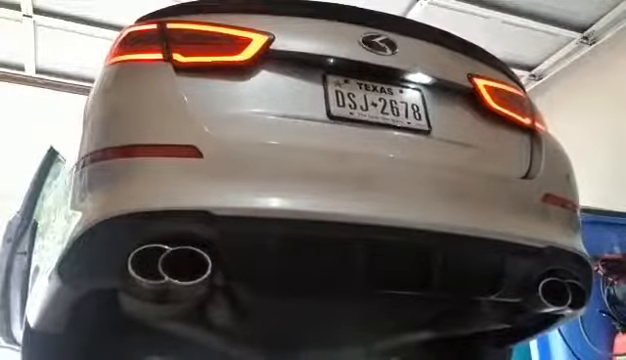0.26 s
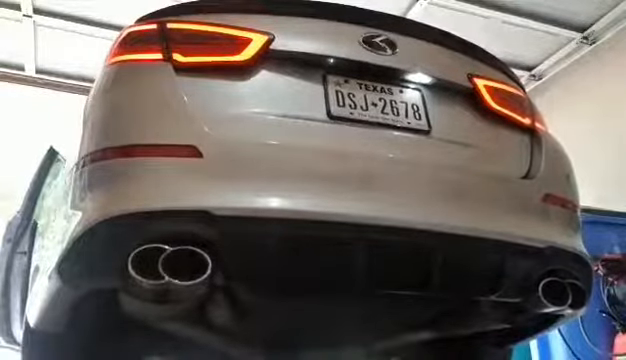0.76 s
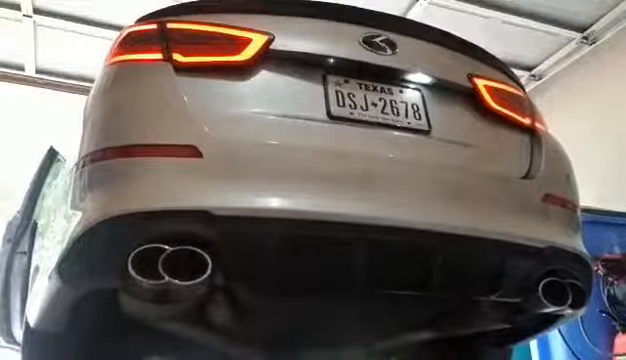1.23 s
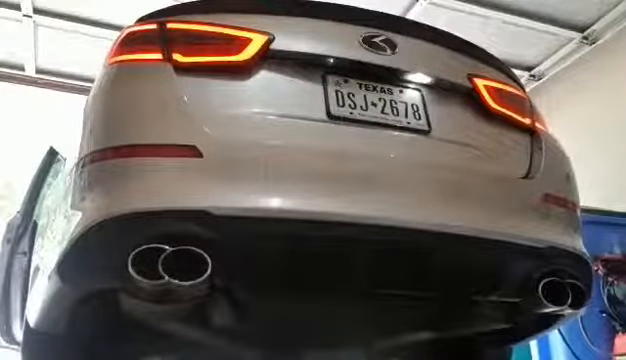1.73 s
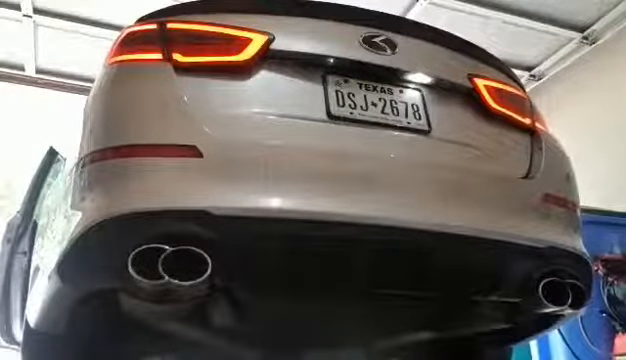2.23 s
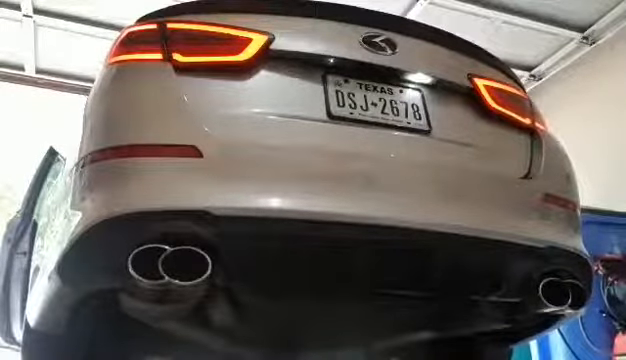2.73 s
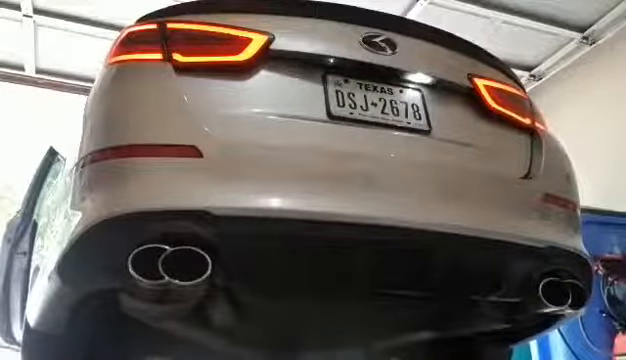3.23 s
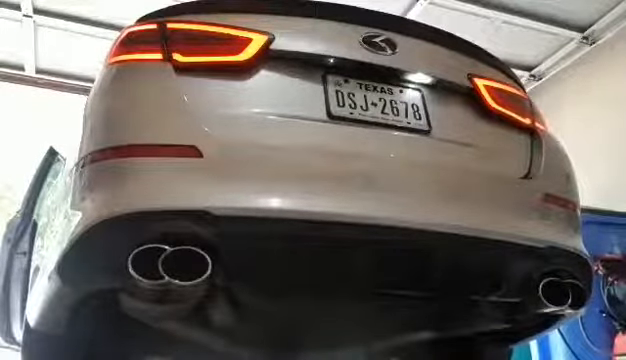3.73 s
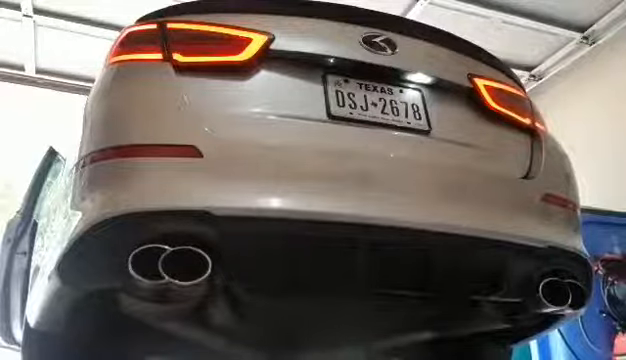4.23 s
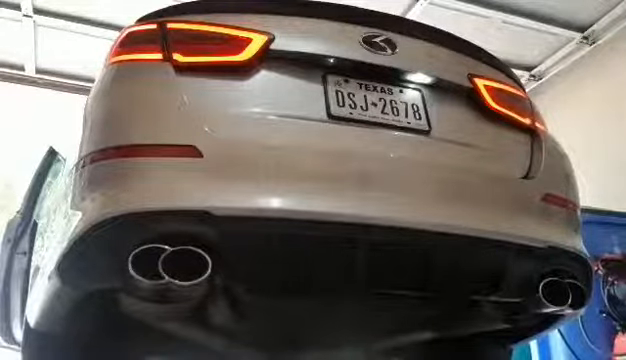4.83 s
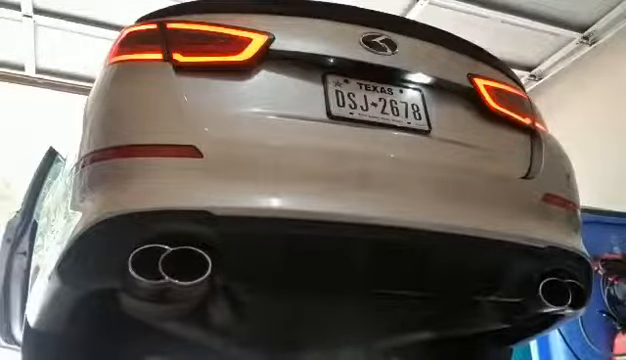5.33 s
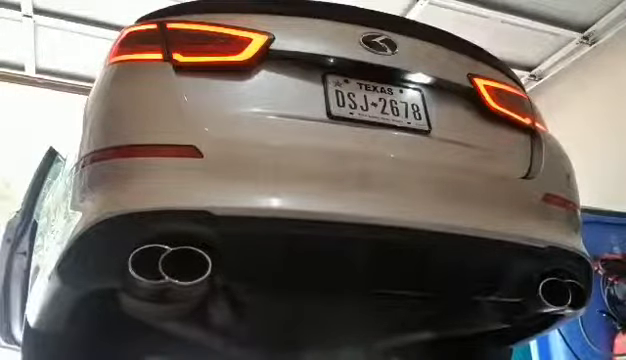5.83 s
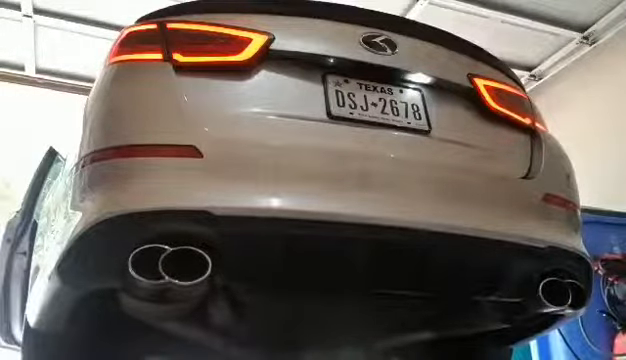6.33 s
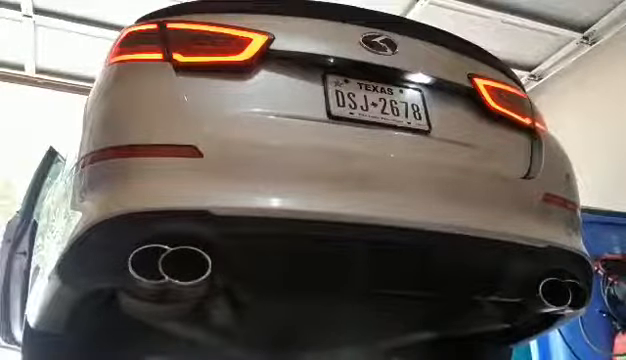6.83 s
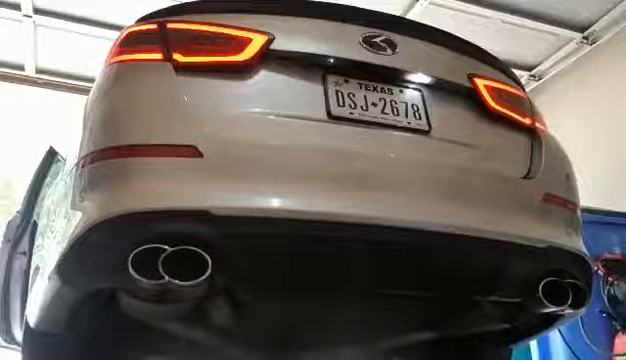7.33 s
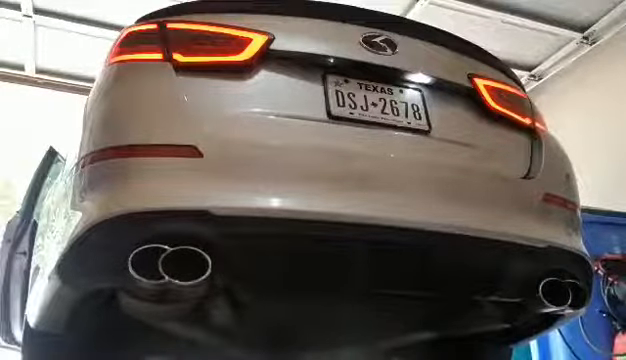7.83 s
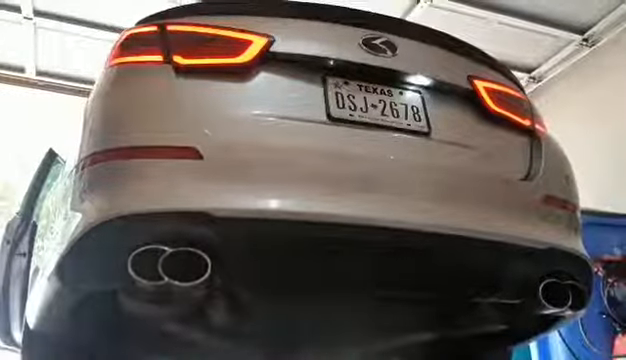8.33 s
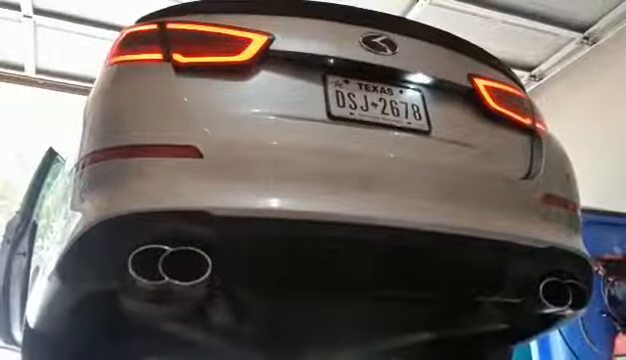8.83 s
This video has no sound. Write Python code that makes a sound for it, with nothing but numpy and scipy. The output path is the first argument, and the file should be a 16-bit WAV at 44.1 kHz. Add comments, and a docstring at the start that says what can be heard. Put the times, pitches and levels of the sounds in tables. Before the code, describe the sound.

A turbocharged four-cylinder car is heard from just behind its tailpipes in a garage with short, tight echoes. For the first 4.5 seconds it idles with a deep, even, hollow throb and faint valve ticking. A gentle rev rises until about 5.2 seconds and drops with a thumping pop. A second, higher rev runs from 6 to 6.7 seconds, barking at the top, followed by a quick string of pops. From 7.3 seconds the engine climbs much higher, rasping over rushing gas and a growing turbo hiss. At about 8.3 seconds the throttle shuts: the blow-off valve gives a high whistle and a sputtering rush of air, while the exhaust crackles and bangs rapidly until around 8.8 seconds. A short, light blip with two small pops comes near 9 seconds, with the engine still spinning fast.

```python
"""A turbocharged four-cylinder car, heard from just behind its tailpipes, idles in a garage and is then
blipped higher and higher. Each firing booms in the silencer and, under load, steepens into a rasp in
the pipes over a hiss of gas. When the throttle shuts, unburnt fuel pops in the exhaust, and after the
highest blip the turbo's blow-off valve whistles. Valve gear and intake sound faintly under the bonnet."""
import sys
import numpy as np
from scipy import signal
from scipy.fft import rfft, irfft, next_fast_len
from scipy.io import wavfile
from scipy.ndimage import uniform_filter1d

SR = 44100
rng = np.random.default_rng(int(sys.argv[2]) if len(sys.argv) > 2 else 0)


def inscribe(sig):
    """Save sig as 16-bit PCM at rate SR to the path in sys.argv[1].

    A 1-D sig is mono; a 2-D sig holds one channel per row.
    Samples are clipped to [-1, 1] before scaling.
    """
    pcm = np.round(np.clip(np.atleast_2d(sig).T, -1, 1) * 32767)
    wavfile.write(sys.argv[1], SR, pcm.astype(np.int16))


N = 399987
TIME = np.arange(N) / SR
IDLE_RATE = 29.0  # firings a second, the unit of every engine speed
VALVE_OPENS_S = 8.268  # the blow-off, just after the highest blip


def gain_of(db):
    """Decibels to amplitude."""
    return 10 ** (np.asarray(db) / 20)


def evened(x):
    """Scales to rms 1."""
    return x / np.sqrt(np.mean(x ** 2) + 1e-20)


def levelled(x, size=3050):
    """Holds the running rms of the mono mix at 1, smoothing over size samples."""
    power = np.atleast_2d(x).mean(0) ** 2
    return x / np.sqrt(abs(uniform_filter1d(uniform_filter1d(power, size), size)) + 1e-14)


def curve_at(points, hz):
    """Reads a curve on a log-frequency axis."""
    f, value = np.transpose(points)
    return np.interp(np.log(hz + 1), np.log(f), value)


def cut(x, hz, kind, order):
    """High-pass or low-pass."""
    return signal.sosfilt(signal.butter(order, hz, kind, fs=SR, output="sos"), x)


def ring(x, modes):
    """Parallel resonances."""
    return sum(gain_of(db) * signal.lfilter(*signal.iirpeak(hz, hz / width, SR), x)
               for hz, width, db in modes)


def waver(hz):
    """Random wavering of rms 1, up to a rate."""
    return evened(cut(rng.standard_normal(N), hz, "low", order=2))


def noise_band(hz, width_hz):
    """A band of noise that follows a pitch curve."""
    a, b = cut(rng.standard_normal((2, N)), width_hz, "low", order=2)
    return evened(((a + 1j * b) * np.exp(2j * np.pi * np.cumsum(hz) / SR)).real)


def lagged(x, lag_s):
    """Follows a control with inertia."""
    keep = np.exp(-1 / (lag_s * SR))
    return signal.lfilter([1 - keep], [1, -keep], x)


def plateau(start, end, rise_s, fall_s):
    """Rises from 0 to 1 after start and falls back after end."""
    return np.clip(np.minimum((TIME - start) / rise_s, 1 - (TIME - end) / fall_s), 0, 1)


def gust(start, db, attack_s, hold_s, decay_db_per_s):
    """Attack, hold and a steady decay."""
    age = TIME - start
    decayed_db = decay_db_per_s * np.maximum(age - attack_s - hold_s, 0)
    return np.clip(age / attack_s, 0, 1) * gain_of(db - decayed_db)


def throb(firings, depth):
    """A gain that jumps at every firing and sags until the next."""
    return evened(1 + depth * np.exp(-(firings % 1) / 0.5))


# Stereo width of the garage. Each row: frequency in Hz, left-right likeness from 0 to 1.
LIKENESS = [(60, 0.0383), (280, 0.74), (610, 0.91), (1330, 0.0051), (2900, 0), (13000, 0.0154)]
# Its stereo balance. Each row: frequency in Hz, left minus right in dB.
BALANCE = [(60, 18), (370, -2), (1200, -1.5), (2200, -0.5), (4000, -3), (7500, -.5), (13000, 1)]
def diffuse(spectrum):
    """Coloured stereo noise with floor and wall echoes, narrow in the low mids and wide in the treble."""
    size = next_fast_len(N)
    hz = np.fft.rfftfreq(size, 1 / SR)
    a, b = rfft(rng.standard_normal((2, size)))
    same = np.clip(curve_at(LIKENESS, hz), -1, 1)
    pair = np.array([a, same * a + np.sqrt(1 - same ** 2) * b])
    pair *= gain_of(np.outer([.5, -.5], curve_at(BALANCE, hz)))
    echoes = 1 + .12 * np.exp(-2j * np.pi * hz * .0016) + .2 * np.exp(-2j * np.pi * hz * .0071)
    return evened(irfft(pair * echoes * gain_of(curve_at(spectrum, hz)), size)[:, :N])


def garage(x, wet_db, t60, lean_db):
    """Direct sound, reaching the right microphone first, plus a short tail of scattered reflections."""
    t = np.arange(SR // 2) / SR
    taps = rng.standard_normal((2, len(t))) * (rng.random((2, len(t))) < .08)
    taps *= (t > .003) * gain_of(-60 * t / t60)
    taps *= gain_of(wet_db) / np.linalg.norm(taps[1])
    taps[[0, 1], [6, 0]] += 1  # the direct sound
    return signal.oaconvolve(x[None], taps, axes=1)[:, :N] * gain_of([[lean_db / 2], [-lean_db / 2]])


# Throttle blips. Each row: opening and shutting in seconds, firings a second at opening and at the top,
# bend of the fall before it, bend of the climb, load rise in seconds, load 0 to 1, load fall in seconds.
BLIPS = [(4.51, 5.224, 29.0, 58.1, 1.0, 1.16, .12, .8, .5),
         (5.982, 6.699, 44.5, 83.5, 1.96, 2.32, .34, .78, .24),
         (7.253, 8.262, 70.7, 188.5, 1.96, 1.34, .13, .9, .66),
         (8.91, 9.07, 134.5, 154.2, .95, .9, .08, .6, .4)]
def engine_speed():
    """The engine climbs while the throttle is open and coasts down until the next blip."""
    speed, last_shut, last_top = np.zeros(N), 0, IDLE_RATE
    for opens, shuts, low, top, fall_bend, climb_bend, *_ in BLIPS:
        fall = low + (last_top - low) * np.interp(TIME, [last_shut, opens], [1, 0]) ** fall_bend
        climb = (top - low) * np.interp(TIME, [opens, shuts], [0, 1]) ** climb_bend
        speed = np.where(TIME >= last_shut, fall + climb, speed)
        last_shut, last_top = shuts, top
    return speed


def engine_load(idle_load=0.62454, linger_s=0.15026):
    """How hard the cylinders fire; the load outlasts the throttle while the manifold empties."""
    blips = [load * plateau(opens, shuts + linger_s, rise_s, fall_s)
             for opens, shuts, *_, rise_s, load, fall_s in BLIPS]
    return np.max(blips + [idle_load * (TIME < BLIPS[0][1])], axis=0)


# Tone of the valve gear. Each row: frequency in Hz, relative noise density in dB.
CLATTER_TONE = [(100, -5), (220, -5), (400, -4), (800, -10.5), (1200, -8.5), (1500, -15), (1800, -13.5),
                (2600, -13.5), (3500, -19.5), (4800, -25), (6500, -23.5), (8500, -34.5), (12000, -31)]
def clatter(firings, level_db=-46):
    """Valve gear and injectors, far off under the bonnet, ticking with the firings."""
    return gain_of(level_db) * diffuse(CLATTER_TONE) * throb(firings + 0.9, depth=0.55)


# Tone of the open intake. Each row: frequency in Hz, relative noise density in dB.
INDUCTION_TONE = [(800, -19), (1500, -7), (2300, -0.5), (3200, -6), (4500, -12.5), (7000, -17), (9000, -30)]
def induction(firings, load, gain_db=-47.5):
    """Air drawn through the open throttle growls under the bonnet, swelling as the manifold fills."""
    draw = lagged(load * plateau(BLIPS[0][0], BLIPS[-1][1], .3, .1), lag_s=.16)
    return gain_of(gain_db) * draw ** 2.418 * diffuse(INDUCTION_TONE) * throb(firings, depth=.8)


# Hiss of the spinning turbo. Each row: frequency in Hz, relative noise density in dB.
TURBO_TONE = [(1000, -25), (2400, -2.5), (4600, -6.5), (6300, 0.5), (7300, -7), (8500, -16.5), (12000, -14)]
def turbo(speed, hiss_db=-49, whoosh_db=-40.5, whoosh_start_s=8, first_hz=2200.5, last_hz=4899.5):
    """The turbo lags the engine and hisses; near full boost a whoosh climbs until the valve opens."""
    spin = lagged(np.maximum(speed - IDLE_RATE, 0) / speed.max(), lag_s=.14)
    hz = first_hz + (last_hz - first_hz) * np.interp(TIME, [whoosh_start_s, VALVE_OPENS_S], [0, 1]) ** 3
    whoosh = np.array([noise_band(hz, width_hz=650) for _ in range(2)])
    swell = plateau(whoosh_start_s, VALVE_OPENS_S + 0.0594, 0.3249, 0.0928)
    return gain_of(hiss_db) * spin ** .7 * diffuse(TURBO_TONE) + gain_of(whoosh_db) * swell * whoosh


# Broad rush of gas. Each row: frequency in Hz, relative noise density in dB.
GAS_TONE = [(150, 9), (330, 11), (900, 6.5), (1300, 5.5), (1650, -1), (2400, -0.5), (3500, -6.5),
            (4800, -8.5), (6500, -5.5), (8500, -15), (10500, -12), (12800, -9.5)]
def gas(firings, speed, hiss_db):
    """Gas rushing out of the pipes, which only sets in above idle flow."""
    flow = np.sqrt(np.clip(1 - (IDLE_RATE / speed) ** 4, 0, 1))
    return gain_of(hiss_db) * flow * diffuse(GAS_TONE) * throb(firings, depth=0.23)


# Bright hiss of a fine jet. Each row: frequency in Hz, relative noise density in dB.
JET_TONE = [(2000, -30), (4200, -20), (5400, -9.5), (6700, -2.5), (7600, -12.5), (8600, -15), (10300, 2),
            (12800, 0)]
# Short spurts of air. Each row: start in seconds, level in dB, decay in dB a second.
SPURTS = [(5.33, -53.5, 600), (6.857, -47, 700), (7.632, -47.5, 701.5), (8.208, -36, 200),
          (8.54, -29.5, 400)]
def vented_air(speed, sputter, spool_db=-31.5):
    """Boost air escapes in spurts, a sputtering rush and a roar; the turbo's hiss joins at top speed."""
    spurts = sum(gust(start, db, 0.00796, 0, decay) for start, db, decay in SPURTS)
    rush = gust(VALVE_OPENS_S, db=-27, attack_s=0.0116, hold_s=0.0419, decay_db_per_s=58)
    roar = gust(VALVE_OPENS_S - .03, db=-22.5, attack_s=0.1392, hold_s=0.1316, decay_db_per_s=29.5)
    spool = gain_of(spool_db) * (speed / speed.max()) ** 4.4
    return (sputter * rush + spurts) * diffuse(JET_TONE) + np.hypot(roar, spool) * diffuse(GAS_TONE)


# Ring of the blow-off valve. Each row: pitch in Hz, width in Hz, gain in dB.
VALVE_MODES = [(5434.6, 272.7, -8), (6127.5, 204, -2), (6542.7, 340, 0.5)]
def blow_off(speed, whistle_hz=6694.8, whistle_sag_hz=69.73, skirt_hz=6787.2, skirt_sag_hz=499.86):
    """The valve whistles, a noisy skirt sinks with the boost, and the air behind rings up a shriek."""
    spent = 1 - np.exp(-(np.maximum(TIME - VALVE_OPENS_S, 0) / .24) ** 2)
    whistle = gust(VALVE_OPENS_S, db=-25, attack_s=0.024, hold_s=0.0381, decay_db_per_s=85)
    whistle *= levelled(noise_band(whistle_hz - whistle_sag_hz * spent, width_hz=32), size=900)
    skirt = gust(VALVE_OPENS_S, db=-29, attack_s=0.0763, hold_s=0.1387, decay_db_per_s=72.5)
    skirt *= noise_band(skirt_hz - skirt_sag_hz * spent, width_hz=250)
    shriek = gust(VALVE_OPENS_S, db=-36.5, attack_s=0.2335, hold_s=0.0521, decay_db_per_s=61.5)
    shriek *= evened(cut(ring(rng.standard_normal(N), VALVE_MODES), 6958, "low", order=6))
    sputter = gain_of(2 * waver(hz=13.5) + 2 * waver(hz=130))
    valve = garage(whistle + skirt + sputter * shriek, wet_db=1, t60=.2, lean_db=-3.5)
    return valve + vented_air(speed, sputter)


# Midrange ring of the tailpipes. Each row: pitch in Hz, width in Hz, gain in dB.
PIPE_MODES = [(346.06, 130, -15), (462.47, 45, -5), (530.05, 51.855, -1.5), (619.3, 60, -5),
              (697.06, 60, -5), (799.41, 55, -2), (929.83, 90, -8), (1083.9, 110, -9.5),
              (1275.8, 140, -13.5)]
def tailpipe(x, far_delay_s=.0017, far_share=.5):
    """The pipes ring, neighbouring modes in opposite sign; the far pair arrives later and weaker."""
    rung = ring(x, PIPE_MODES[::2]) - ring(x, PIPE_MODES[1::2])
    near = cut(cut(rung, 300, "high", order=3), 1400, "low", order=6)
    far = np.r_[np.zeros(round(far_delay_s * SR)), near][:len(near)]
    return near + far_share * far


def spit(x):
    """The bright edge of a shock, which leaves the pipes without ringing them."""
    return cut(cut(x, 1400, "high", order=1), 2700, "low", order=3)


def crackle(per_s=190, spread_db=3.5, burst_s=0.000921, spit_db=-12):
    """Unburnt fuel goes off in many small bursts around the top of the highest blip and after it."""
    sparks = (rng.random(N) < per_s / SR) * gain_of(spread_db * np.minimum(rng.exponential(1, N), 2))
    bursts = lagged(sparks, burst_s) * rng.standard_normal(N)
    sound = evened(tailpipe(bursts) + gain_of(spit_db) * spit(bursts))
    envelope = gust(8, db=-32.5, attack_s=0.0054, hold_s=0.2717, decay_db_per_s=42.5)
    return garage(envelope * sound, wet_db=-4, t60=.2, lean_db=-2)


# Exhaust pops. Each row: start in seconds, crack level in dB, burst decay in seconds,
# gain of the bright spit within the crack in dB, thump level in dB.
POPS = [(5.332, -25.5, 0.01514, -22, -10.5), (6.747, -19, 0.001543, -14.5, -23),
        (6.782, -14, 0.001523, -18, -12), (6.822, -22, 0.003945, -20.5, -18),
        (6.859, -14.5, 0.001645, -18.5, -18), (6.887, -21.5, 0.00186, -18.5, -21),
        (8.271, -15, 0.002108, -17, -29), (8.296, -15, 0.00292, -14.5, -26.5),
        (8.319, -15, 0.002774, -11, -20.5), (8.363, -11, 0.00414, -12.5, -16),
        (8.393, -12.5, 0.00352, -13.5, -6), (8.409, -10, 0.00192, -16, -10.5),
        (8.432, -5.5, 0.00191, -15.5, -8), (8.442, -7, 0.001982, -15.5, -8),
        (8.452, -14.5, 0.001665, -11.5, -14), (8.482, -8.5, 0.002878, -18, -14),
        (8.499, -23.5, .002, -15.5, -9), (8.542, -10, 0.0035, -14, -14),
        (8.552, -10.5, 0.00299, -17.5, -24), (8.655, -16.5, 0.00448, -9, -27.5),
        (8.695, -7.5, 0.001605, -12.5, -12), (8.731, -19, 0.00206, -8, -24),
        (8.745, -24.5, 0.001688, -16.5, -16), (8.912, -22.5, 0.001973, -28, -14),
        (8.952, -28, 0.002186, -25.5, -17.5)]
def afterfire(thump_s=.0015, tail_s=0.03322):
    """Each pop of unburnt fuel is a sharp burst in the pipes and a slower push through the silencer."""
    t = np.arange(SR // 4) / SR
    push = cut(cut(t * np.exp(-t / thump_s), 66.84, "high", order=4), 110.9, "low", order=4)
    cracks, thumps = np.zeros((2, N + len(t)))
    for start, crack_db, crack_s, spit_db, thump_db in POPS:
        burst = rng.standard_normal(len(t)) * (np.exp(-t / crack_s) + 0.1362 * np.exp(-t / tail_s))
        crack = tailpipe(burst + 14 * (t == 0)) + gain_of(spit_db) * spit(burst)
        at = round(start * SR)
        cracks[at:at + len(t)] += gain_of(crack_db) * crack / abs(crack).max()
        thumps[at:at + len(t)] += gain_of(thump_db) * push / abs(push).max()
    return garage(cracks[:N], wet_db=-6, t60=.22, lean_db=-2) + thumps[:N]


def sizzle(firings, rasp_db, offset_db=-24.5):
    """Hard pulses tear into fine eddies at the pipe lips."""
    hardness = np.clip((rasp_db + 49.5) / 12, 0, 1)
    return gain_of(rasp_db + offset_db) * hardness * diffuse(JET_TONE) * throb(firings, depth=1.5)


# The lope of the engine. Each entry: one cylinder's accent in dB, in firing order.
CYLINDERS_DB = [-.1, -.5, 1.1, -.5]
def cylinder(firings):
    """Strength of the cylinder that is firing; one fires harder than the rest."""
    return gain_of(CYLINDERS_DB)[firings.astype(int) % len(CYLINDERS_DB)]


# Narrow pipe tones that sing while little gas flows. Each row: pitch in Hz, width in Hz, gain in dB.
HOLLOW_MODES = [(231.85, 8, 2), (290.72, 7.5, -14.5), (348.02, 7.4, -3), (494.93, 22, -3.5),
                (520.41, 16, 1.5), (562.88, 34, -11.5), (868.36, 20, -12), (928, 46, -13.5),
                (1066.3, 51, -13.5)]
def hollow(firings, speed, idle_db=-46, damping_db=1.5, soft_hz=1150):
    """At idle the soft-edged pulses ring the pipes in steady tones, which faster flow damps."""
    fronts = cut(np.diff(firings.astype(int), prepend=0) * cylinder(firings), soft_hz, "low", order=4)
    tones = levelled(cut(ring(fronts, HOLLOW_MODES), 220, "high", order=4))
    return gain_of(idle_db - damping_db * (speed - speed.min())) * tones


# Barks of the exhaust. Each row: start, length, rise and fall in seconds, then strength in dB.
BARKS = [(4.853, 0.3798, .14, .3, 2.5), (6.563, 0.188, 0.06072, 0.08804, 15),
         (6.823, 0.10386, 0.06605, 0.1284, 8), (7.347, 0.0675, 0.04794, 0.10136, 5.5),
         (7.492, 0.17851, 0.1604, 0.08728, 13), (8.178, 0.2866, 0.0846, 0.1107, 5)]
def barks():
    """Pulses steepen into shocks in the pipes: a lift in dB, of which each exhaust layer takes a part."""
    return sum(db * plateau(start, start + length, rise, fall) for start, length, rise, fall, db in BARKS)


def rasp(firings, speed, load, jitter_s=.00007, scatter_db=.5, puff_cycles=.085, spit_db=-33):
    """The steep front of each pulse, and the turbulent puff behind it, ring the tailpipes."""
    # Each front arrives a little early or late, which blurs its upper harmonics.
    firings = np.maximum.accumulate(np.maximum(firings + speed * jitter_s * waver(hz=60), 0))
    count, phase = firings.astype(int), firings % 1
    # Turbulent share: slow firings puff, fast ones snap, and a coasting engine burns raggedly.
    rough = np.interp(speed, [56, 72], [.93, .08])
    rough += .06 * (1 - rough) * np.clip(1 - load, 0, 1)
    spread_db = scatter_db * (1 + np.log2(speed / IDLE_RATE))
    imbalance = 0.4813 * speed / speed.max() * np.clip(speed / IDLE_RATE - 1, 0, 1)
    strength = gain_of(spread_db * rng.standard_normal(N)[count]) * (1 + imbalance * (-1.) ** count)
    strength *= cylinder(firings) ** (IDLE_RATE / speed)
    fronts = levelled(np.diff(count, prepend=0) * 1.)
    puff_shape = 0.25 + phase / puff_cycles * np.exp(1 - phase / puff_cycles)
    puffs = evened(puff_shape * rng.standard_normal(N))
    drive = strength * (np.sqrt(1 - rough) * fronts + np.sqrt(rough) * puffs)
    pipes = tailpipe(drive) + gain_of(spit_db) * spit(drive * (1 - rough))
    left, right = garage(pipes, wet_db=-8, t60=.2, lean_db=-1)
    shaded = left - 0.7946 * cut(left, 900, "high", order=1)  # less upper rasp reaches the left
    return levelled(np.array([shaded, right]))


# Deep resonances of silencer and garage. Each row: pitch in Hz, width in Hz, gain in dB.
SILENCER_MODES = [(59.806, 8.802, 6), (88.573, 15.46, 4), (108.35, 12, -14), (148.16, 16.726, 0.3727),
                  (230.27, 14, -19.5)]
# Notches where the tailpipes cancel at the microphone. Each row: pitch in Hz, width in Hz.
NULLS = [(117, 6.9), (195, 41.9), (285, 78)]
def silencer(x):
    """Deep resonances and nulls; the small outlets radiate almost nothing below them."""
    x = -ring(x, SILENCER_MODES)
    for hz, width in NULLS:
        x = signal.lfilter(*signal.iirnotch(hz, hz / width, SR), x)
    return cut(cut(x, 51.839, "high", order=7), 310, "low", order=3)


def coasting(sound, speed, load, shelf_db=-8, shelf_hz=115):
    """A slowly coasting engine pumps air in limp, round pulses, so all but the deep bass drops."""
    deep = cut(cut(sound, shelf_hz, "low", order=5)[::-1], shelf_hz, "low", order=5)[::-1]  # zero phase
    limp = np.clip(1 - load / 0.3145, 0, 1) * np.interp(speed, [80, 120], [1, 0])
    return deep + gain_of(shelf_db * limp) * (sound - deep)


# Firings drop out just after the throttle shuts. Each row: centre in seconds, half length in seconds.
MISSES = [(5.303, 0.02513), (6.807, 0.01144), (8.341, 0.0234)]
def boom(firings, speed, load, bark_db, idle_db=-12.5, unloaded_db=-15, merge_rate=48.27):
    """One soft pressure pulse a firing booms in the silencer; at high speed the pulses run together."""
    count, phase = firings.astype(int), firings % 1
    revs = speed / speed.max()
    distinct = 1 / np.hypot(1, (speed / merge_rate) ** 1.8586)
    pulling = sum(plateau(opens, shuts - .1, 0.092, 0.077) for opens, shuts, *_ in BLIPS)
    # Alternate cylinders differ at idle, and more when pulling at high revs.
    imbalance = 0.093 * distinct ** 4 + 0.18975 * revs ** 3 * pulling
    strength = distinct * (1 + 0.08 * rng.standard_normal(N)[count]) + imbalance * (-1.) ** count
    missed = sum(np.exp(-((TIME - centre) / half_s) ** 2) for centre, half_s in MISSES)
    combustion = strength * (1 - missed) * gain_of(unloaded_db * (1 - load) + 0.2831 * bark_db)
    pumping = 0.17502 * revs ** 2 * (1 - pulling) * (1 + .4 * rng.standard_normal(N)[count])
    eddies = 0.01835 * np.clip(speed / IDLE_RATE - 1, 0, 1) * waver(hz=300)  # gas churns above idle
    pulse = phase / 0.16272 * np.exp(-phase / 0.14939)
    sound = coasting(silencer((combustion + pumping) * (pulse + eddies)), speed, load)
    return gain_of(idle_db) * sound / sound[TIME < BLIPS[0][0]].std()


def scene():
    """One crankshaft and its load drive the engine layers; pops and blow-off come at set times."""
    speed, load, bark_db = engine_speed(), engine_load(), barks()
    drift = 0.012078 * waver(hz=2) * (IDLE_RATE / speed) ** 2  # the idle wanders around its beat
    firings = .66 + np.cumsum(speed) / SR + drift  # running count, starting partway through a cycle
    octaves_up = np.log2(speed / IDLE_RATE)
    rasp_db = -46.5 + 7 * octaves_up - 12.5 * (1 - load) + 1.0303 * bark_db
    hiss_db = -43 + 3.5 * octaves_up - 16.5 * (1 - load) + 0.2404 * bark_db
    bass = boom(firings, speed, load, bark_db) + hollow(firings, speed)
    bass = np.array([np.r_[np.zeros(6), bass[:-6]], bass])  # reaches the left 6 samples later
    exhaust = bass + gain_of(rasp_db) * rasp(firings, speed, load)
    exhaust += sizzle(firings, rasp_db) + gas(firings, speed, hiss_db)
    engine_bay = clatter(firings) + induction(firings, load) + turbo(speed)
    return exhaust + engine_bay + afterfire() + crackle() + blow_off(speed)


def record(dry):
    """Rounds off the highest peaks, then cuts the top treble."""
    ceiling, edge_hz = .92, 13080
    rounded = dry / (1 + (dry / ceiling) ** 8) ** (1 / 8)
    lowpass = signal.firwin(511, edge_hz, window=("kaiser", 9), fs=SR)
    return signal.oaconvolve(rounded, lowpass[None], "same")


dry = scene()
out = record(dry)
inscribe(out)
```